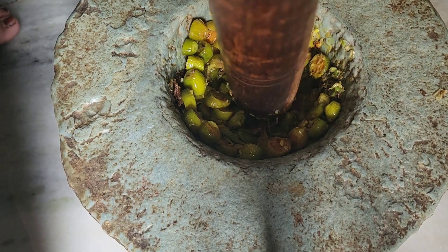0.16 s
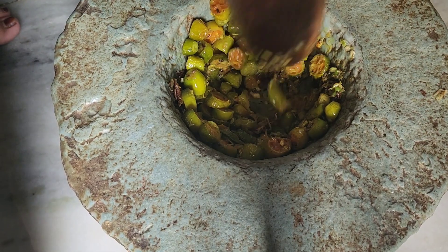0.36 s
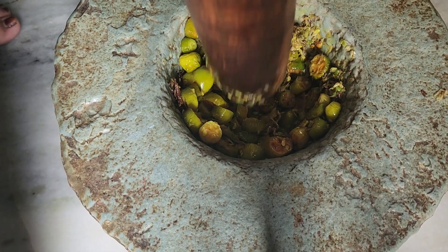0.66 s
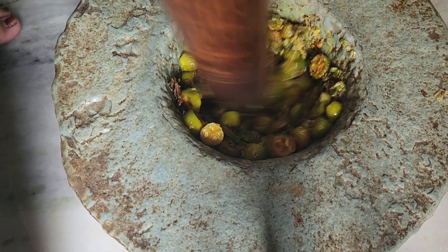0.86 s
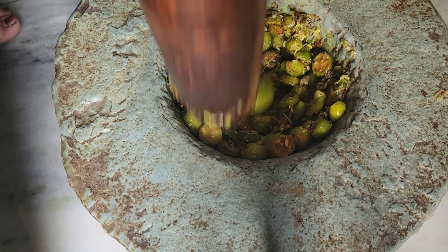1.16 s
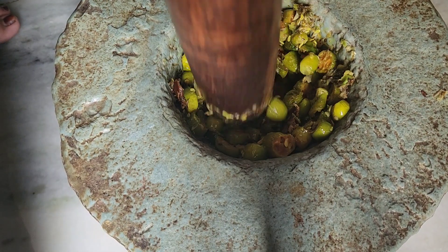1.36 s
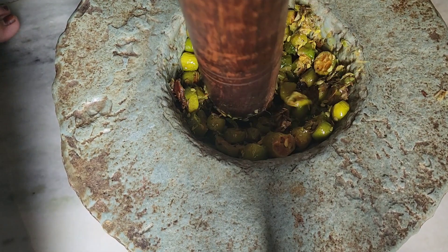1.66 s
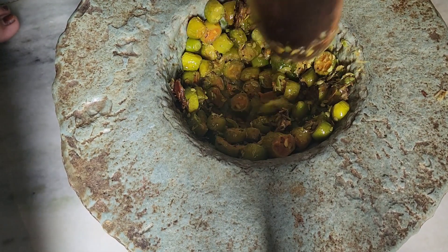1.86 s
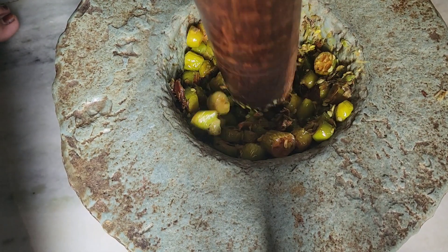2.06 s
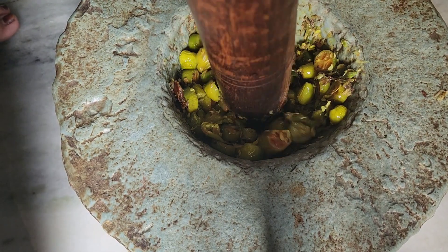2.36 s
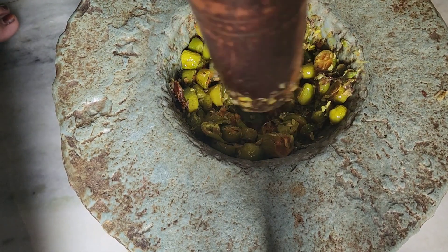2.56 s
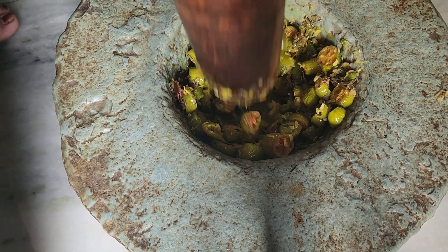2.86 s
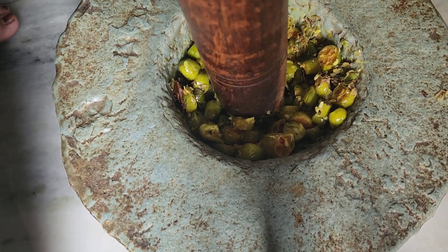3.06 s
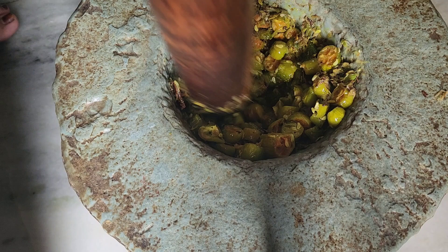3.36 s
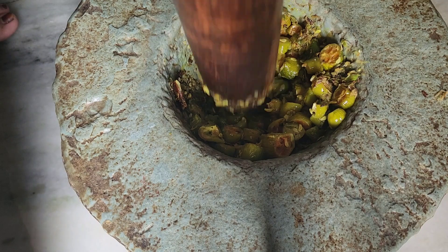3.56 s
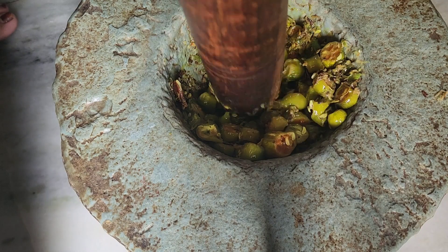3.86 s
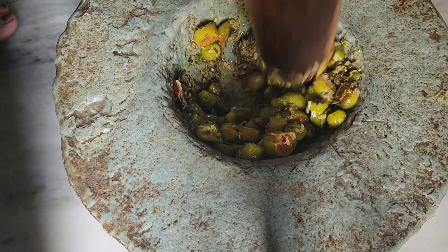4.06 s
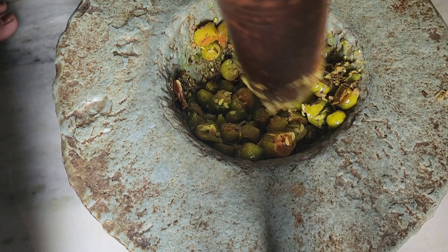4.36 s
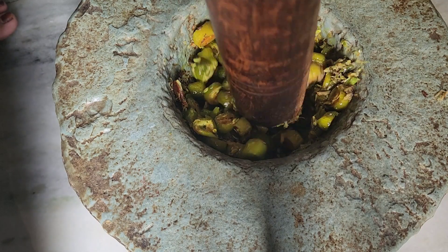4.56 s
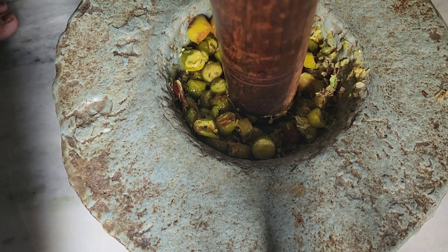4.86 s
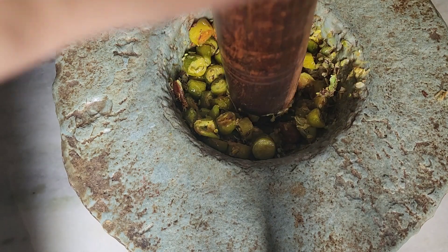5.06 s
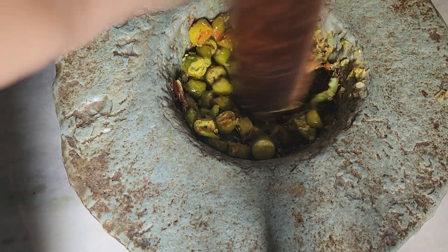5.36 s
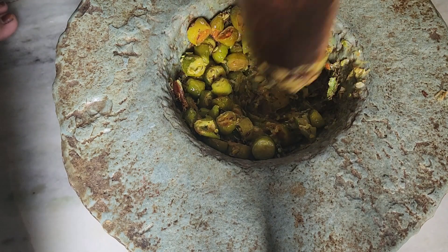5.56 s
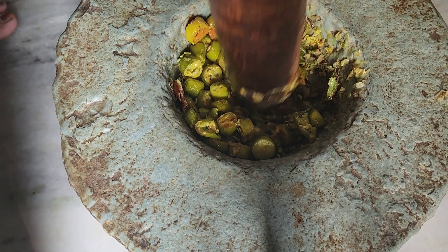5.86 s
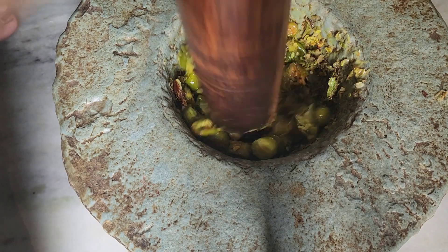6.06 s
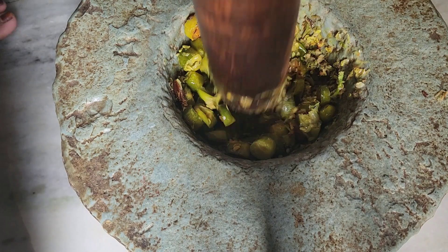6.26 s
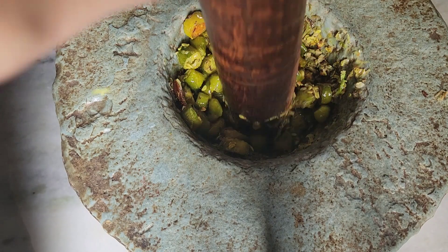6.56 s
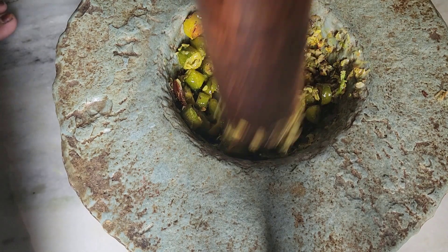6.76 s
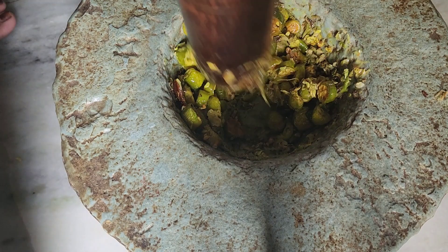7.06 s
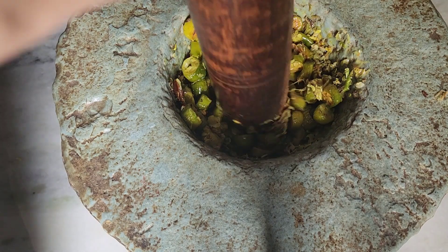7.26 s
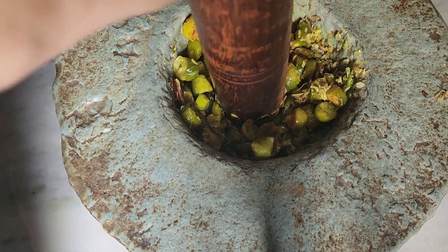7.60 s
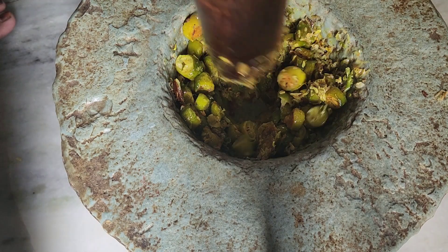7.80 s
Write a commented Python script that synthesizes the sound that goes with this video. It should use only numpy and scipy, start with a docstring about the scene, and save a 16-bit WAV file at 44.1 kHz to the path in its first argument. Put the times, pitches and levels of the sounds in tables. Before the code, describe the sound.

Close up in a tiled kitchen, soft berries squelch and crackle under steady, even blows of a wooden pestle in a stone mortar. Some blows are muffled by pulp, while others knock sharply on the stone and make the floor resonate. The sticky mash pops faintly as the pestle lifts, with light rubbing and a small scrape. A low background hum and a few very faint, high distant chirps lie beneath the pounding.

```python
"""A wooden pestle pounds cooked berries in a stone mortar on a kitchen floor, close up and in stereo.
Each stroke bursts skins and squeezes pulp, then often knocks through to the stone: pestle and bowl ring
and the floor booms a little late. Juice fizzes in the mash and wet pulp lets go with tiny pops, with
faint rubbing and a scrape. The tiled room answers, over a quiet background and a few distant calls."""
import sys
import numpy as np
from scipy import signal
from scipy.fft import rfft, irfft
from scipy.io import wavfile
from scipy.ndimage import uniform_filter1d

SR = 44100
rng = np.random.default_rng(int(sys.argv[2]) if len(sys.argv) > 2 else 0)


def master(y):
    """Save y as 16-bit WAV."""
    cut = np.clip(np.atleast_2d(y).T, -1, 1)
    pcm = np.round(cut * 32767)  # scale
    wavfile.write(sys.argv[1], SR, pcm.astype(np.int16))


N = 349713

# the pestle reaches stone:
# (time [s], thud [dB], pestle ring [dB], floor boom [dB], bowl ring [dB], pestle pan to the left [dB])
KNOCKS = [(0.15, -20.5, -33.5, -37, -53, 3), (0.461, -13.5, -8.5, -30, -34.5, 0.5),
          (0.883, -26, -49, -40.5, -71, 8.5), (1.232, -11.5, -13, -27.5, -27, 2),
          (1.555, -14.5, -9, -32.5, -25, 3.5), (1.613, -11, -13, -28, -17.5, 1.5),
          (1.957, -59, -52, -46.5, -54, 4), (2.323, -19, -32.5, -36.5, -55, 2),
          (2.666, -9, -18.5, -35.5, -70, 4), (3.387, -24.5, -41, -42.5, -75, 2),
          (3.74, -13.5, -28, -40.5, -52.5, 2), (4.11, -19, -29.5, -31.5, -49, 0.5),
          (4.7716, -14.5, -13.5, -34, -67, -3.5), (5.343, -45.5, -51.5, -43, -50, 2),
          (5.666, -18, -21, -41, -61, 4), (5.7197, -8, -19, -28.5, -54, 1.5),
          (6.081, -15.5, -28.5, -29, -45.5, -1.5), (6.419, -35, -46, -39, -57.5, 6),
          (6.774, -14, -33.5, -38.5, -46, 9), (6.806, -11, -17, -27, -33.5, 0.5),
          (7.159, -17, -33, -39, -42.5, 0), (7.525, -19, -33.5, -40, -48.5, -0.5),
          (7.844, -8, -16, -37, -31.5, -1.5)]
# pulp crushes harder until the tip bottoms out:
# (time at the bottom [s], level [dB], colour [Hz], wet hiss [dB], rise per 10 dB [ms])
CRUSHES = [(0.1349, -20, 2110, -34.5, 1.6), (0.5135, -26.5, 2400, -39, 11), (0.8606, -29.5, 2330, -58, 25),
           (1.231, -24.5, 1420, -33, 9.1), (1.615, -28, 1630, -34.5, 7.2), (1.968, -37.5, 4560, -56, 16),
           (2.3216, -35.5, 2190, -41, 44), (2.6696, -30.5, 1414, -38, 12), (3.0299, -30, 2605, -40.5, 13.7),
           (3.3783, -32, 2400, -36, 7.9), (3.7489, -33.5, 2720, -41, 26), (4.1083, -32, 1300, -44.5, 22),
           (4.4893, -35, 3240, -50.5, 75), (4.8243, -33.5, 1840, -48.5, 22),
           (5.3486, -33.5, 2510, -46.5, 33), (5.7227, -26.5, 1420, -43.5, 13.5),
           (6.0831, -33.5, 2210, -46.5, 29), (6.4274, -25, 2180, -46.5, 10), (6.795, -32, 4880, -47.5, 8),
           (7.1525, -29.5, 3950, -39.5, 27), (7.5249, -28, 1530, -47, 21), (7.912, -31.5, 1510, -42.5, 21)]


def undb(db):
    return 10 ** (np.asarray(db) / 20)


def band(x, lo_hz, hi_hz):
    return signal.sosfilt(signal.butter(2, [lo_hz, min(hi_hz, .45 * SR)], "band", fs=SR, output="sos"), x)


def unit(x):
    return x / np.sqrt(np.mean(x ** 2))


def add(out, s, sound, pan_db):
    """Mix a sound in at time s; a positive pan leans left."""
    i = int(s * SR)
    out[:, i:i + sound.shape[-1]] += (undb([[pan_db / 2], [-pan_db / 2]]) * sound)[:, :N - i]


def ring(modes, seconds, scatter_db, detune):
    """Decaying stereo modes and their time axis; every blow shares its energy out differently."""
    hz, db, t60, lead = np.transpose(modes)[:, :, None]
    level_draw, pitch_draw = rng.standard_normal((2, len(modes), 1))
    t = np.arange(int(seconds * SR)) / SR
    poles = 2j * np.pi * hz * (1 + detune * pitch_draw) - np.log(1000) / t60
    partials = undb(db + scatter_db * level_draw) * np.exp(poles * t)
    partials *= (-1.) ** np.arange(len(modes))[:, None]  # neighbours swing in opposite sense
    return np.array([(partials * np.exp(.5j * side * lead)).imag.sum(axis=0) for side in (1, -1)]), t


def crackle(size, spread_db, alike=0.11):
    """Dense clicks of very uneven size, only partly alike left and right."""
    grain = undb(spread_db * rng.exponential(size=size // 24 + 1).clip(0, 5)).repeat(24)[:size]
    mid, left, right = rng.standard_normal((3, size))
    return grain * (alike * mid + np.array([left, right]))


def background():
    """A bed of house and street noise that swells gently; the bass sits in the centre."""
    # tone of the bed: (frequency [Hz], relative spectral level [dB])
    spectrum = [(15, -28), (25, -4), (55, 2), (82, 4.5), (127, -15), (190, -13.5), (363, -25), (516, -23.5),
                (1130, -36), (1440, -31.5), (5000, -49.5), (7510, -43), (16000, -102.5)]
    knot_hz, knot_db = np.transpose(spectrum)
    hz = np.maximum(np.fft.rfftfreq(N, 1 / SR), 1)
    colour = undb(np.interp(np.log(hz), np.log(knot_hz), knot_db))
    mid, side = rfft(rng.standard_normal((2, N)))
    width = np.clip(hz / 900, .15, 1)
    hush = irfft(colour * np.array([mid + width * side, mid - width * side]), N)
    swell = uniform_filter1d(rng.standard_normal(N // 8000 + 1).repeat(8000)[:N], 8000)
    return undb(-46.5 + 0.87 * swell) * unit(hush)


def rubs_and_calls():
    """Faint rubbing, a scrape and fizz in the mortar, and a few distant gliding calls: bands of noise."""
    # noise bands: (time [s], length [s], start pitch [Hz], end pitch [Hz], width [Hz], level [dB])
    glides = [(0, 0.093, 2120, 2160, 310, -50.5), (0.623, 0.18, 2070, 2070, 92, -60.5),
              (1.022, 0.19, 2250, 2400, 146.4, -60), (0.407, .05, 1030, 1030, 150, -52.5),
              (1.031, .14, 1150, 1300, 200, -56), (2.537, .09, 1926, 1800, 1600, -55),
              (2.844, 0.059, 3400, 3400, 150, -74), (3.109, 0.16, 3260, 2810, 707, -50.5),
              (3.49, .2, 4310, 3960, 3000, -51.5), (5.239, 0.08, 2384, 3400, 505, -42.5),
              (6.202, 0.2, 2950, 3240, 600, -46)]
    out = np.zeros((2, N))
    for s, seconds, from_hz, to_hz, width_hz, db in glides:
        t = np.arange(int(seconds * SR)) / SR
        phase = 2 * np.pi * (from_hz * t + (to_hz - from_hz) * t ** 2 / (2 * seconds))
        rough = unit(band(rng.standard_normal((2, len(t))), 12.0, width_hz / 2))
        envelope = np.minimum(t / 0.017, 1) * undb(-12 * t / seconds)
        add(out, s, undb(db) * rough * np.sin(phase) * envelope, 0)
    return out


def juice_fizz():
    """Juice fizzes on in the crushed mash: each spell swells, holds and fades."""
    # spells of fizz: (start [s], hold [s], level [dB])
    spells = [(-.08, .02, -64), (2.68, .02, -72.5), (3.42, 0.11, -71), (4.802, 0.16, -63.5),
              (7.113, 0.075, -71.5)]
    attack_s, fade_db_per_s, rest_db = 0.027, 82, -87.5
    t, gain = np.arange(N) / SR, undb(rest_db)
    for s, hold_s, db in spells:
        fade_s = np.maximum(t - s - attack_s - hold_s, 0)
        gain = gain + np.clip((t - s) / attack_s, 0, 1) ** 2 * undb(db - fade_db_per_s * fade_s)
    return gain * unit(band(crackle(N, 2), 4000, 17000))


def berry_bursts():
    """Cue list: (time [s], level [dB], colour [Hz], wet hiss [dB], rise per 10 dB [ms], t60 [s])."""
    # the tip touches the heap and skins burst: (time [s], level [dB], colour [Hz], wet hiss [dB])
    touches = [(0.1265, -32, 2160, -40.5), (0.4624, -33.5, 1370, -39), (0.839, -33, 2630, -37.5),
               (1.1792, -42.5, 5600, -44), (1.557, -37.5, 1380, -44.5), (1.9427, -37.5, 2280, -39.5),
               (2.281, -42.5, 5780, -53), (2.641, -36, 2020, -40), (2.979, -58, 4150, -44),
               (3.3459, -43, 6500, -49.5), (3.696, -44.5, 5330, -48.5), (4.065, -42, 3900, -43),
               (4.43, -38.5, 3260, -42), (4.771, -34, 1307, -38), (5.3223, -37.5, 4700, -46.5),
               (5.6672, -42, 1280, -58), (6.037, -38, 4950, -42), (6.404, -36.5, 2610, -41.5),
               (6.779, -35, 3310, -31.5), (7.078, -48, 3660, -41.5), (7.469, -42, 3600, -42.5),
               (7.8469, -32.5, 1245, -39.5)]
    # single berries crack during and after a stroke: (time [s], level [dB], colour [Hz], wet hiss [dB])
    cracks = [(0.933, -66, 3530, -49), (1.208, -34.5, 2020, -46), (1.661, -48, 1610, -45),
              (2.012, -66, 3360, -49.5), (2.3773, -51.5, 1610, -62), (3.47, -49, 3260, -55),
              (3.7196, -39.5, 2460, -50), (4.1985, -43.5, 2300, -56.5), (4.452, -38.5, 5600, -56),
              (4.5481, -41, 1820, -51), (4.8166, -28.5, 2540, -43), (5.077, -30, 1760, -68),
              (5.3359, -31.5, 5800, -35), (5.4147, -49.5, 1470, -67), (5.4505, -45, 2980, -68.5),
              (5.542, -58.5, 2980, -77), (5.584, -59.5, 2200, -80), (5.7718, -39.5, 2470, -56),
              (5.965, -59.5, 2330, -80), (6.0558, -31.5, 1940, -52), (6.155, -43, 2310, -55),
              (6.1715, -49, 5060, -43), (6.4614, -41, 1610, -43.5), (6.5334, -44, 1680, -51),
              (6.9047, -55.5, 4600, -70), (6.967, -59, 1570, -70), (7.109, -42, 2200, -58),
              (7.269, -57, 1400, -51.5), (7.3043, -60, 5870, -58), (7.5019, -37, 3930, -41),
              (7.6616, -54, 6000, -54.5), (7.8893, -29.5, 2120, -46)]
    touch_t60_s, crush_t60_s, crack_t60_s = .19, 0.086, 0.073
    touch_rise_ms, bare_rise_ms, crack_rise_ms = 5.5, 2.4, 7.3
    cues = [(*row, crush_t60_s) for row in CRUSHES]
    cues += [(*row, crack_rise_ms, crack_t60_s) for row in cracks]
    for row in touches:
        bare = any(abs(row[0] - knock[0]) < .008 for knock in KNOCKS)  # straight through to the stone
        cues.append((*row, bare_rise_ms if bare else touch_rise_ms, touch_t60_s))
    return sorted(cues)


def berry_crunch():
    """Cracks build up under the load and ring in wet pockets of the mash; juice hisses above."""
    out, last_s = np.zeros((2, N)), 0
    t = np.arange(int(.36 * SR)) / SR - .06  # zero at the peak
    for s, db, hz, hiss_db, rise_ms, t60 in berry_bursts():
        shape = undb(np.where(t < 0, 10 * 1000 * t / rise_ms, -60 * t / t60))
        shape *= 1 + .7 * np.exp(-np.abs(t) / .0015)  # the skin gives way with a snap
        shape *= t > last_s - s  # a burst builds only from the one before it
        last_s = s
        pockets_hz = hz * np.exp([0, *(.3 * rng.standard_normal(3) - .2)]).clip(.4, 2.5)
        squelch = sum(unit(shape * band(crackle(len(t), 3.0, .5), f / 1.14, f * 1.14))
                      for f in pockets_hz)
        skins = unit(shape * band(crackle(len(t), 4.4, 0.54), 420, 5000))
        juice = unit(shape * band(crackle(len(t), 2.0), 5500, 20000))
        burst = undb(db) * (.5 * squelch + 0.73 * skins) + undb(hiss_db) * juice
        shape_rms = np.sqrt(np.mean(shape ** 2))
        add(out, s + t[0], shape_rms * burst, pan_db=-1 + 0.5 * rng.standard_normal())
    return out


def pestle_knocks():
    """Each knock rings pestle, bowl and floor; pulp under the tip lengthens the push and dulls the thud."""
    # modes of the wooden pestle, the mortar's thud, the stone bowl and the floor slab:
    # (frequency [Hz], relative level [dB], t60 [s], phase lead on the left [rad])
    pestle_modes = [(565, -13, 0.35, 0.1), (557, 7.5, 0.14, -1.1), (785, -3.5, 0.033, -0.8),
                    (1370, -19.5, 0.058, 3.5), (2290, -15.5, 0.077, 2), (3510, -28.5, 0.058, 1.5)]
    thud_modes = [(233.8, -9, 0.15, -1), (318.4, -12, 0.19, -0.5), (402, -17.5, 0.28, -2),
                  (469.3, -7, 0.1, -0.3), (658, -2.5, 0.055, -1), (844, -3.5, 0.065, 0.2),
                  (1020, -17, 0.2, 2)]
    bowl_modes = [(1078, 1.7, 0.094, 2.3), (1424, 12, 0.044, 0.47), (1449, 4.7, 0.15, 1.8),
                  (1467, 2.6, 0.3, 1.7), (1574, 10, 0.016, 0.63)]
    floor_modes = [(77.12, 1, 0.85, 0.23), (83.14, 1.5, 0.63, .3), (109.7, -6, 0.62, 0.23),
                   (147, -4, 0.45, 0.34), (175.43, -0.5, 0.78, 0.14), (209.1, -4, 0.4, 0.85),
                   (265, -14.5, 0.95, 0.62), (290.8, -4, 0.34, 0.17)]
    bare_contact_ms, pulp_ms_per_db, slap_db, floor_swell_s = 0.68, 0.07, -3, .0067
    out = np.zeros((2, N))
    for s, thud_db, wood_db, boom_db, bowl_db, pan_db in KNOCKS:
        # pulp that mutes the pestle's ring also lengthens the half-sine push
        contact_ms = bare_contact_ms + pulp_ms_per_db * max(thud_db - wood_db, 0)
        size = int(contact_ms * SR / 1000)
        push = np.sin(np.pi * np.arange(.5, size) / size)[None]
        wood, t = ring(pestle_modes, seconds=.3, scatter_db=1.5, detune=.004)
        wood *= 1 - np.exp(-t / 0.00047)  # the bending wave runs up the shaft first
        add(out, s, undb(wood_db) * wood, pan_db)

        # the mortar shudders on its base: too many close modes to tell apart
        mid, side = unit(band(rng.standard_normal((2, len(t))), 160, 650))
        envelope = undb(-60 * t / 0.41) * np.minimum(t / 0.0051, 1)
        shudder = 0.21 * np.array([mid + 0.8 * side, mid - 0.16 * side]) * envelope
        body, _ = ring(thud_modes, seconds=.3, scatter_db=1.5, detune=.02)
        thud = signal.fftconvolve(body + shudder, push / push.sum(), axes=1)
        add(out, s, undb(thud_db) * thud, pan_db / 2)
        slap = np.sin(np.pi * np.arange(2 * size) / size)[None]  # the push, straight through the air
        add(out, s, undb(thud_db + slap_db) * slap, pan_db / 2)

        bowl, _ = ring(bowl_modes, seconds=.6, scatter_db=1.5, detune=.004)
        add(out, s, undb(bowl_db) * bowl, -1)
        slab, t = ring(floor_modes, seconds=1., scatter_db=2.5, detune=.02)
        slab *= 1 - np.exp(-t / floor_swell_s)  # the slab takes time to swing
        add(out, s, undb(boom_db) * slab, 0)
    return out


def pulp_pops():
    """Wet pulp lets go of wood and stone in tiny pops; a few faint ones scatter over every lift."""
    # the loudest pops: (time [s], peak [dB], pitch [Hz])
    loud = [(0.199, -27, 13900), (0.2398, -36, 10700), (0.5662, -32, 13900), (0.9843, -40, 8500),
            (1.095, -54, 13800), (2.433, -42, 10700), (2.675, -27, 6900), (2.8211, -49.5, 10640),
            (2.905, -47.5, 8700), (3.338, -34, 13100), (3.476, -39, 6950), (3.6413, -49, 8600),
            (4.1571, -48, 14350), (4.2044, -37, 13900), (5.9899, -48, 6650), (6.147, -32, 3500),
            (6.555, -34, 13700), (6.9597, -43, 8600), (7.8399, -21.5, 6530)]
    pops_per_lift, faint_db, faint_hz, t60_s = 4, -54.5, 9500, 0.0037
    out = np.zeros((2, N))
    t = np.arange(int(.012 * SR)) / SR
    when, size, pitch = rng.random((pops_per_lift * len(CRUSHES), 3)).T
    bottoms_s = np.repeat(np.array(CRUSHES)[:, 0], pops_per_lift)
    faint = zip(bottoms_s + .08 + .22 * when, faint_db + 12 * (size - .5), faint_hz * (.5 + pitch))
    for s, db, hz in [*loud, *faint]:
        detune, phase, pan = rng.standard_normal(3)
        pop = np.sin(2 * np.pi * hz * (1 + 0.0387 * detune) * t + phase * np.array([[1], [-1]]))
        if s < N / SR:
            add(out, s, undb(db) * pop * undb(-60 * t / t60_s), 2 * pan)
    return out


def kitchen_reverb(x):
    """The tiled room's tail; the bass lingers longest, and left and right hear different walls."""
    # reverb bands: (frequency [Hz], t60 [s], level [dB])
    decays = [(210, 0.51, -13.5), (467, 0.22, -15), (1300, 0.34, -11), (3960, 0.31, -14),
              (9300, 0.27, -9.5)]
    t = np.arange(int(.7 * SR)) / SR
    tail = 0
    for hz, t60, db in decays:
        fade = undb(-60 * t / t60) * np.minimum(t / 0.021, 1)
        wash = band(rng.standard_normal((2, len(t))), hz / 1.795, hz * 1.5)
        tail = tail + undb(db) * wash * fade / np.sqrt(np.sum(fade ** 2))
    return signal.fftconvolve(x, tail, axes=1)[:, :N]


def scene():
    """The close pounding feeds the reverb; rubs, calls and background are mixed in dry."""
    near = pestle_knocks() + berry_crunch() + pulp_pops() + juice_fizz()
    return near + kitchen_reverb(near) + rubs_and_calls() + background()


def record(dry):
    """The microphone drops the deepest bass, the loudest peaks are rounded and the top is cut."""
    heard = signal.sosfilt(signal.butter(2, 50, "high", fs=SR, output="sos"), dry)
    rounded = np.tanh(0.72 * heard) / 0.66
    return signal.sosfilt(signal.ellip(10, .2, 70, 15900, fs=SR, output="sos"), rounded)


dry = scene()
out = record(dry)
master(out)
```